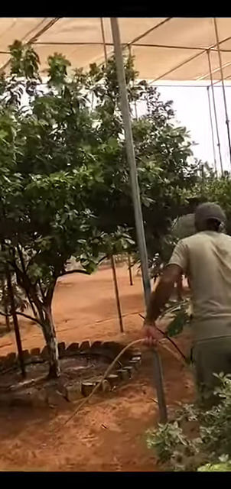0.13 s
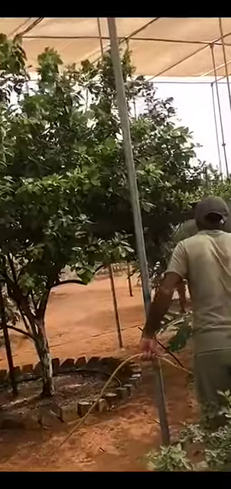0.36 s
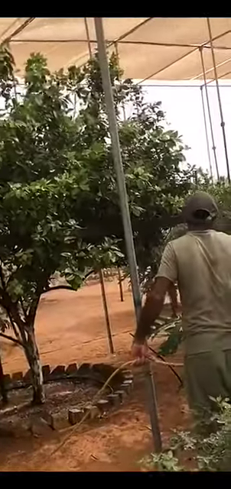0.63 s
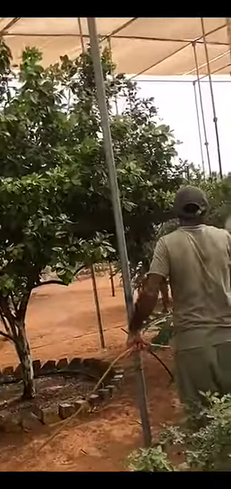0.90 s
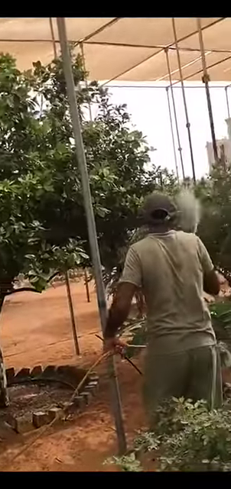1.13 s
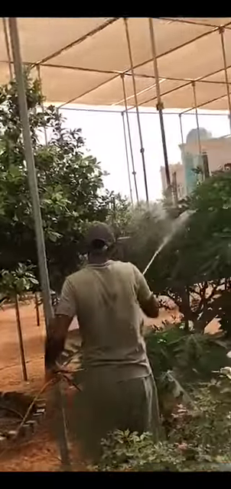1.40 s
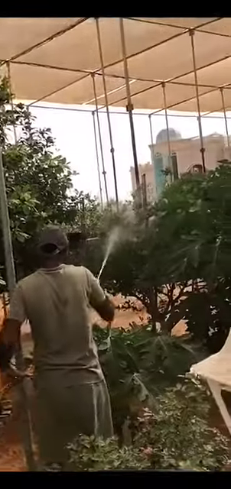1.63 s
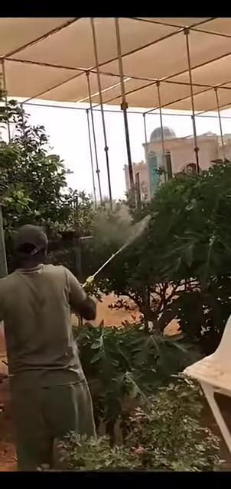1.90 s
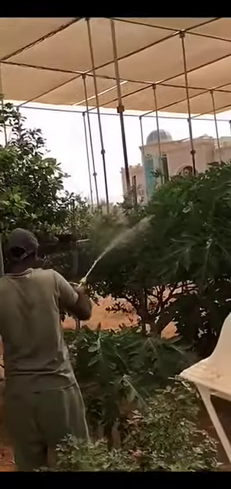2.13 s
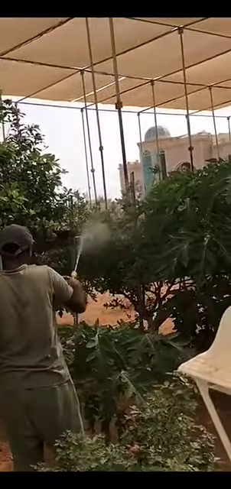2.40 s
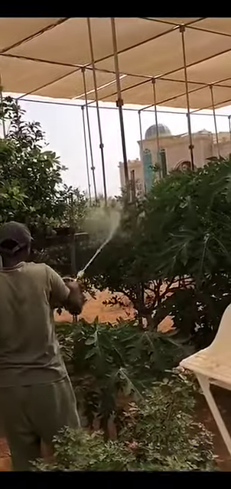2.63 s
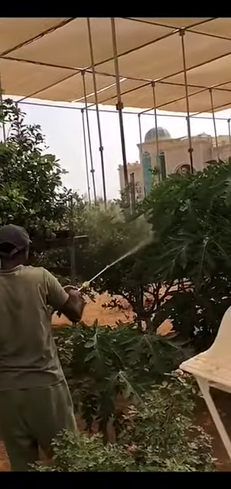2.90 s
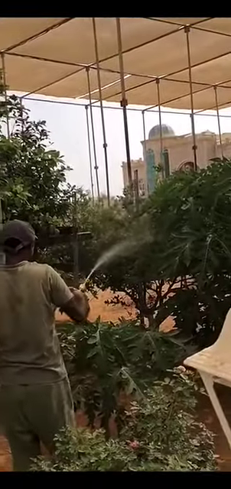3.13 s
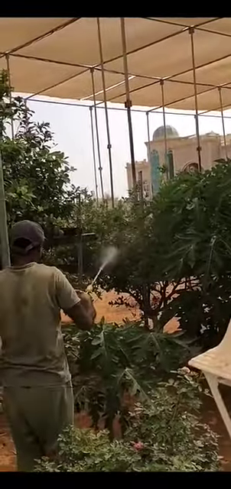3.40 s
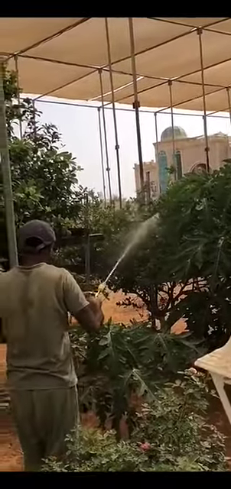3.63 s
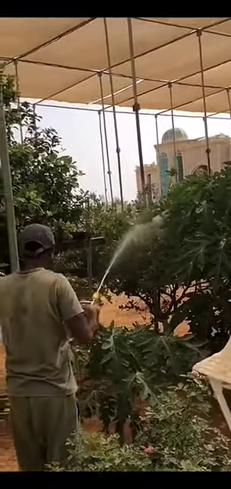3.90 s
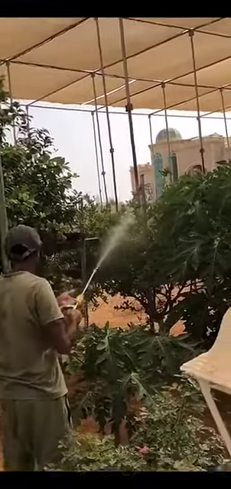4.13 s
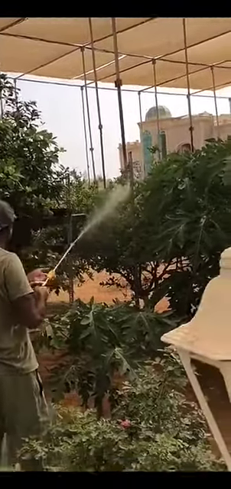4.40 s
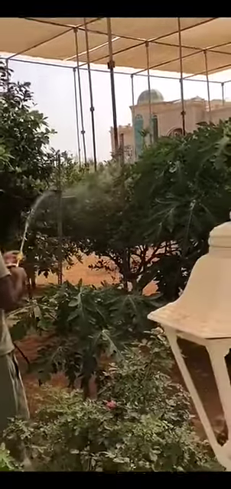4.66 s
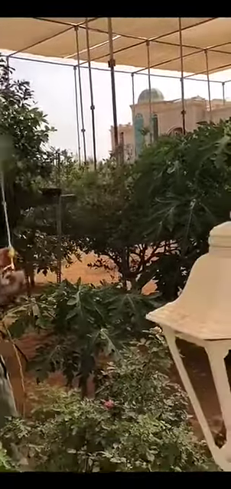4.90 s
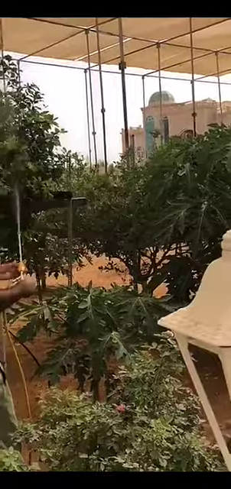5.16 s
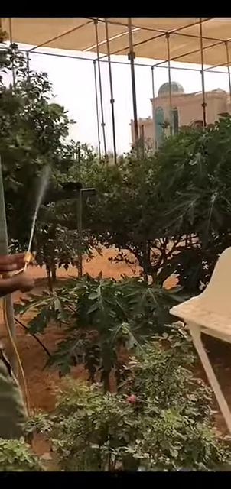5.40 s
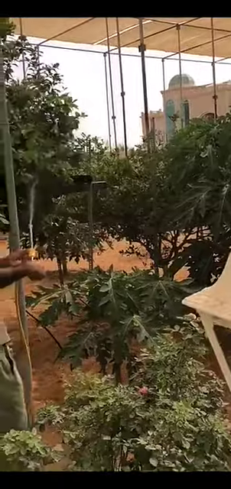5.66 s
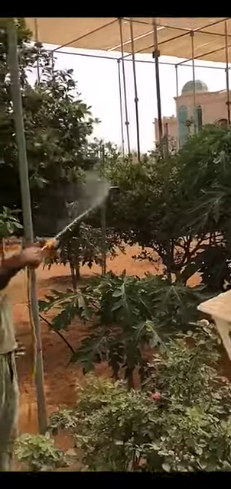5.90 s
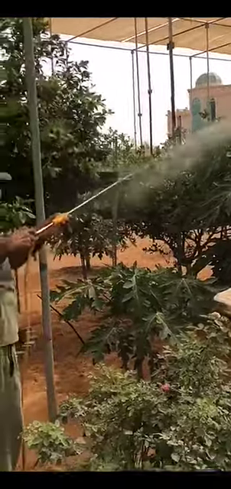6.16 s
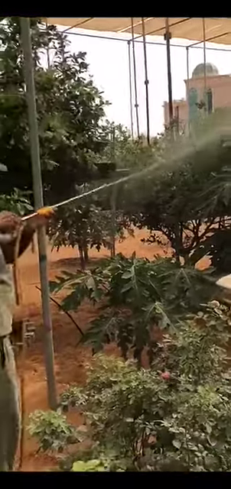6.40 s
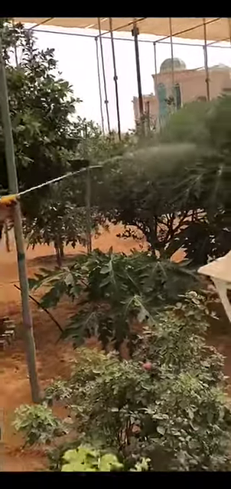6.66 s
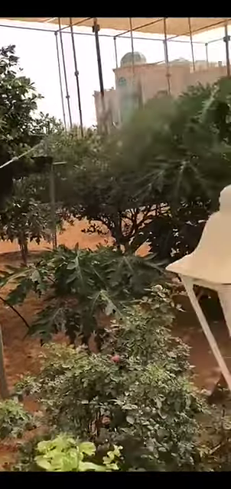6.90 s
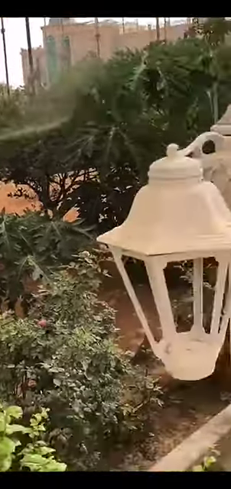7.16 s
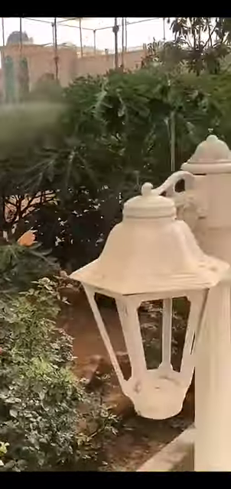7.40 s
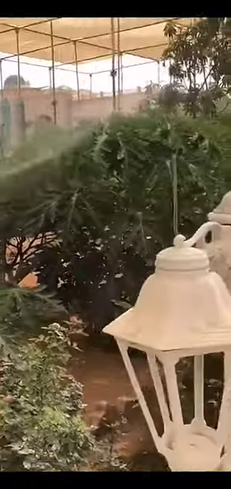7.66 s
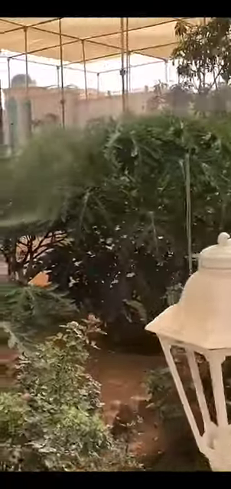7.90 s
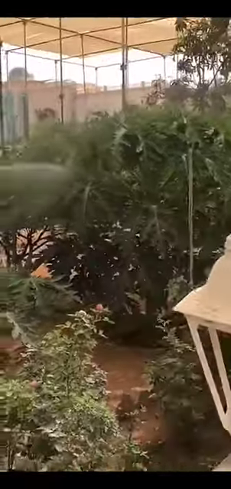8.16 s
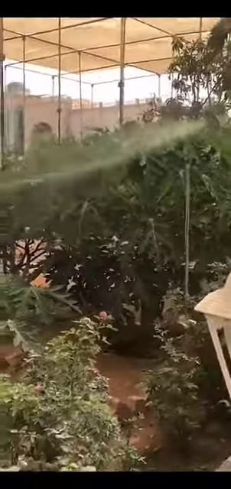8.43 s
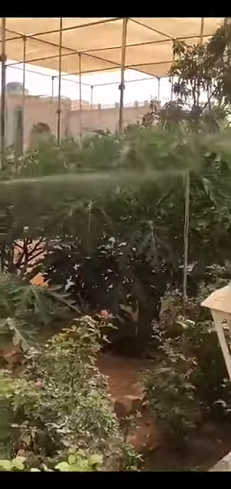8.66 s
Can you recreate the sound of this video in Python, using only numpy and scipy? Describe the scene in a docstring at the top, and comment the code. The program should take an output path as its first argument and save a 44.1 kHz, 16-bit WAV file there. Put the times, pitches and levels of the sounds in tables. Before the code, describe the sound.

A small single-cylinder engine drives a spray pump with a fast, low, rattling putter throughout. A fine jet hisses over it, pattering on leaves. A sparrow chirps early; just after three seconds the sound cuts out for an instant, then bird notes and low wind bumps follow. Leaf hits crowd together past five seconds, and the bird returns near seven. Outdoor garden, handheld microphone.

```python
"""A small single-cylinder engine drives a spray pump in a garden, its jet hissing and pattering on leaves.
A sparrow chirps twice early on; near 3 s the engine beat slips late, then all sound drops out briefly.
Bird notes and low wind bumps follow, then strong leaf hits past 5 s; later the engine turns away and the
bird returns. The engine is a sum of firing harmonics, rattle and jet are filtered noise, the bird is
gliding sines, and wind is low noise with short decaying waves."""
import sys
import numpy as np
from scipy import signal
from scipy.fft import rfft, irfft
from scipy.io import wavfile
from scipy.ndimage import uniform_filter1d

SR = 44100
rng = np.random.default_rng(int(sys.argv[2]) if len(sys.argv) > 2 else 0)


def output_pcm(signal):
    """Save a mono or channel-first signal as 16-bit PCM at the path in sys.argv[1].

    Samples are clipped to [-1, 1] before scaling.
    """
    pcm = np.clip(np.atleast_2d(signal).T, -1, 1) * 32767
    wavfile.write(sys.argv[1], SR, np.round(pcm).astype(np.int16))


def gain_from_db(level_db):
    """Turn a decibel level (scalar or array-like) into a linear amplitude factor."""
    decades = np.asarray(level_db, float) / 20
    return 10 ** decades


N = 387638
FIRING_HZ, FIRST_FIRING_S = 31.186, .0294


def in_time(rows):
    """Joins each column after the time column by straight lines, one value a sample."""
    seconds, *columns = np.transpose(rows)
    return [np.interp(np.arange(N) / SR, seconds, column) for column in columns]


def rms_one(x):
    """Scales to rms 1."""
    return x / np.sqrt(np.mean(x ** 2) + 1e-20)


def drift(rate_hz):
    """Slow chance of spread 1: noise at every 40th sample through a double one-pole low-pass."""
    pole = np.exp(-80 * np.pi * rate_hz / SR)
    noise = rng.standard_normal(N // 40 + 2002)
    slow = signal.lfilter([1], [1, -2 * pole, pole * pole], noise)[2000:]
    slow = rms_one(slow - slow.mean())
    return np.interp(np.arange(N) / 40, np.arange(len(slow)), slow)


def banded(source, spectrum, shared_db, own_db, own_rate):
    """Yields (centre Hz, coloured flickering band), about a third octave each, from two noises in turn."""
    hz, db = np.transpose(spectrum)
    top_hz = min(hz[-1], .45 * SR)
    edges = np.geomspace(hz[0], top_hz, int(3 * np.log2(hz[-1] / hz[0])) + 2)
    for k, (low, high) in enumerate(zip(edges, edges[1:])):
        centre = np.sqrt(low * high)
        bandpass = signal.butter(2, [low, high], "band", fs=SR, output="sos")
        band = signal.sosfilt(bandpass, source[k % 2])
        colour_db = np.interp(np.log(centre), np.log(hz), db)
        yield centre, band * gain_from_db(colour_db + shared_db + own_db * drift(own_rate))


def firing_phase(wander_s):
    """Counts engine cycles from the first firing; the governor lets the beat wander a little."""
    t = np.arange(N) / SR - FIRST_FIRING_S + wander_s * drift(1.73)
    return FIRING_HZ * t


def ringing_phases(db, puff_s):
    """Phases for a short symmetric puff that sets a causal exhaust ringing: minimum phase by cepstrum."""
    order = np.arange(129)
    log_level = np.log(gain_from_db(np.interp(order, 1 + np.arange(len(db)), db)))
    log_puff = -.5 * (2 * np.pi * FIRING_HZ * puff_s * np.minimum(order, 10)) ** 2
    cepstrum = irfft(log_level - log_puff)
    cepstrum[129:] = 0  # only the causal half
    # tones under the silencer's resonance run ahead of it
    lead = 1.3 * (np.maximum(5 - order, 0) + (order < 3))
    # tones just above that resonance arrive late
    tailpipe_lag = .35 * np.clip((order - 6) / 2, 0, 1) * (order < 11)
    # the half turn makes the puff arrive as a dip in pressure
    phase = 2 * rfft(cepstrum).imag + lead + np.pi - tailpipe_lag
    return phase[1:len(db) + 1]


def engine(turned, knock_db):
    """Low harmonics ring after each firing; high ones are valve and piston knocks spread round the cycle."""
    # Harmonics of the firing. Each row: multiple of the firing rate, rms level in dB facing the engine,
    # rms level in dB turned away; both before waver, knock and firing strength.
    tones = [(1, -51.0, -50.0), (2, -38.0, -37.0), (3, -44.5, -46.0), (4, -37.0, -34.0), (5, -28.2, -28.8),
             (6, -35.0, -36.5), (7, -44.0, -39.5), (8, -40.0, -41.0), (9, -37.0, -40.5), (10, -47.5, -46.5),
             (11, -44.5, -49.0), (12, -43.5, -48.5), (13, -52.0, -52.5), (14, -50.0, -55.0),
             (15, -55.0, -57.0), (16, -50.5, -47.5), (17, -59.0, -56.0), (18, -62.0, -60.5),
             (19, -59.0, -58.5), (20, -64.0, -62.5), (21, -66.5, -68.5), (22, -58.0, -61.0),
             (23, -53.5, -49.5), (24, -60.5, -59.5), (25, -55.5, -61.5), (26, -57.5, -68.0),
             (27, -52.5, -56.0), (28, -55.0, -56.0), (29, -56.5, -59.0), (30, -67.0, -66.0),
             (31, -62.0, -63.5), (32, -53.5, -57.0), (33, -58.5, -62.0), (34, -55.5, -55.5),
             (35, -63.0, -64.5), (36, -57.0, -57.0), (37, -60.0, -60.0), (38, -57.5, -56.5),
             (39, -66.0, -66.0), (40, -54.5, -55.5), (41, -60.0, -58.0), (42, -65.5, -65.0),
             (43, -67.5, -66.0), (44, -68.0, -74.0), (45, -62.5, -64.5), (46, -63.0, -63.5),
             (47, -62.0, -72.5)]
    knock_flicker_db, knock_slip_rad = 2.5, .45  # knocks are loose in strength and timing
    order, facing_db, away_db = np.transpose(tones)
    phases = ringing_phases(facing_db, puff_s=.00075)
    knocks = order > 16
    phases[knocks] = rng.uniform(0, 2 * np.pi, knocks.sum())
    cycles = firing_phase(wander_s=.00015)
    out = np.zeros(N)
    for k, near, far, phase in zip(order, facing_db, away_db, phases):
        level_db = near + turned * (far - near) + (0.079 + 0.064 * k) * drift(2.0)
        if k > 16:
            level_db = level_db + knock_db + knock_flicker_db * drift(6.1)
            phase = phase + knock_slip_rad * drift(4.0)
        out += gain_from_db(level_db) * np.cos(2 * np.pi * k * cycles + phase)
    # no two firings alike
    firing_strength = gain_from_db(.3 * rng.standard_normal(300))
    strength = firing_strength[np.floor(cycles + 1.1).astype(int)]
    return np.sqrt(2) * out * uniform_filter1d(strength, size=200)


def clatter(clatter_db, tilt_db):
    """Fan, fins and valve gear rattle as flickering noise; the low part is a puff that dies each cycle."""
    # Colour of the rattle. Each row: frequency in Hz, relative density in dB per Hz.
    rattle_colour = [(35, -55), (60, 1.5), (101, -5), (160, -12.5), (226, -1.5), (284, -19.5), (324, -10),
                     (504, -16), (556, -18), (851, -13.5), (1260, -22), (1530, -21.5), (3000, -32),
                     (3900, -68), (6600, -120)]
    puff_fade_db = 9  # fall over one engine cycle
    cycle_share = (firing_phase(wander_s=0) + .08) % 1
    puff = rms_one(uniform_filter1d(gain_from_db(-puff_fade_db * cycle_share), size=90))
    noise = rng.standard_normal((2, N))
    out = 0
    for hz, band in banded(noise, rattle_colour, .8 * drift(13.4), own_db=2.0, own_rate=2.2):
        tilted = band * gain_from_db(tilt_db * np.log2(hz / 900))
        out = out + tilted * (puff if 120 < hz < 600 else 1)
    return gain_from_db(clatter_db) * rms_one(out)


def stuttered(x):
    """At each recorder stutter the sound crosses over within 3 ms to a delayed copy of itself."""
    # Slips of the beat. Each row: start in seconds, added delay in seconds.
    slips = [(2.9655, .0158), (3.29, .0105)]
    t = np.arange(N) / SR
    for start, late in slips:
        share = np.clip((t - start) / .003, 0, 1)
        x = (1 - share) * x + share * np.roll(x, round(late * SR))
    return x


def covers(turned, tilt_db):
    """Covers and tank ring: steady noise passes twice through each resonance, wavering in level."""
    # Resonances of the machine's covers and tank. Each row: frequency in Hz, width in Hz, rms level in dB
    # facing, rms level in dB turned away, rise in dB per dB/octave of rattle brightness.
    resonances = [(838, 220, -46.5, -59, -5), (1075, 200, -63, -54, 3.5), (1275, 280, -66.5, -54.5, 4.5),
                  (1634, 230, -50, -72, -10), (2008, 580, -55.5, -62.5, 1.7), (2710, 420, -73.5, -56, 3.5),
                  (3810, 240, -60, -56.5, -0.2)]
    out = 0
    for hz, width_hz, facing_db, away_db, follows in resonances:
        radius, angle = np.exp(-np.pi * width_hz / SR), 2 * np.pi * hz / SR
        pole = [1, -2 * radius * np.cos(angle), radius * radius]
        once = signal.lfilter([1, 0, -1], pole, rng.standard_normal(N))
        ring = signal.lfilter([1, 0, -1], pole, once)
        level_db = facing_db + turned * (away_db - facing_db) + follows * tilt_db
        out = out + rms_one(ring) * gain_from_db(level_db + 1.5 * drift(4.0))
    return out


def jet():
    """Smooth nozzle hiss with clumps of drops on leaves; low bands follow the splash, high bands the hiss."""
    # The jet as the wand sweeps. Each row: time in seconds, rms level in dB, lower splash against
    # the hiss in dB, topmost sizzle against the hiss in dB.
    jet_course = [(0.0, -45.5, -4, 0), (0.5, -45, -1, 2), (1.3, -44, -1, 0), (1.6, -45, -5.5, 1),
                  (2.0, -43.5, -0.5, 0.5), (3.0, -44.5, 1, 1), (4.3, -45, 0, 0.5), (5.0, -44, 1.5, 3),
                  (5.4, -41, -4, 2), (5.8, -43.5, -1, 0.5), (6.1, -45.5, 1, 1), (6.6, -43, -1, 0),
                  (7.3, -44.5, 1.5, 0), (8.0, -42.5, 1.5, 2), (8.4, -44, 0.5, 1.5), (8.79, -41, -4.5, 0)]
    # Colour of the hiss. Each row: frequency in Hz, relative density in dB per Hz.
    hiss_colour = [(1180, -13.5), (2000, -1.5), (2110, -9.5), (2440, -10.5), (3430, -3.5), (3810, -6),
                   (4560, -7), (12100, -13.5), (13800, -17), (15600, -28)]
    level_db, splash_db, sizzle_db = in_time(jet_course)
    hiss_rise, splash_rise = leaf_hits()
    clumps = gain_from_db(.5 * hiss_rise + 2.2 * drift(14.0))
    # drops of either sign, near 4000 a second before clumping
    drops = (rng.random((2, N)) < 4000 * clumps / SR) * rng.choice([-1, 1], (2, N))
    drops = drops * gain_from_db(3.9 * np.minimum(rng.exponential(1, (2, N)), 5))
    source = rng.standard_normal((2, N)) + .5 * rms_one(drops)
    out = 0
    for hz, band in banded(source, hiss_colour, 0.67 * drift(29.0), own_db=2.0, own_rate=19.7):
        low = np.clip(np.log2(9000 / hz) * 0.5, 0, 1)
        top = np.clip(np.log2(hz / 9000) * 1.5, 0, 1) * (1 + hz / 30000)
        lifted = np.clip(np.log2(hz / 1600) * 1.5, 0, 1)  # leaf hits spare the lowest hiss
        splash = low * (splash_db + lifted * splash_rise)
        out = out + band * gain_from_db(splash + (1 - low) * hiss_rise + top * sizzle_db)
    return gain_from_db(level_db) * rms_one(out)


def leaf_hits():
    """Rises of hiss and splash in dB as the jet meets leaves: each swells, holds and fades a little slower."""
    # The jet lands squarely on a leaf. Each row: time in seconds, rise or dip of the hiss in dB,
    # rise or dip of the splash in dB, length in seconds.
    hits = [(0.054, 5.5, 2, 0.022), (0.482, 4.5, -6, 0.061), (1.383, 3.5, -2, 0.051),
            (1.684, 1.5, 2.5, 0.29), (2.299, 2.5, -1, 0.052), (2.427, 3, -3, 0.12), (3.186, 5.5, -4, 0.024),
            (3.35, 8.5, -4, 0.074), (3.77, 3, 3, 0.031), (4.77, 3, 1, 0.056), (5.048, 4.5, 7, 0.031),
            (5.075, 5.5, 3, .022), (5.13, 4, -2, .04), (5.186, 8, -1, 0.024), (5.236, 3, 4, 0.036),
            (5.277, 5.5, 0, 0.029), (5.355, 3, 2, 0.051), (5.47, 0, 6, .03), (5.505, -2.5, 1, 0.046),
            (5.57, 4, 1, 0.045), (5.652, 4.5, -2, 0.028), (5.706, 9, -2, 0.047), (6.6, 2.5, 3.5, 0.06),
            (6.704, 1, 3, 0.081), (7.197, 4.5, 0.5, 0.058), (7.35, 1.5, 1, 0.034), (8.07, 3.5, 5.5, 0.13),
            (8.11, 3, -0.5, 0.06), (8.317, 1, 7, 0.023), (8.622, 2, 5.5, 0.053), (8.7, 0.5, 6, .07)]
    # lighter random brushes: count, mean rise in dB, mean length in seconds
    count, graze_db, graze_s = 30, 1.2, .025
    t, rise = np.arange(0, N, 40) / SR, 0
    grazes = rng.random((count, 4)) * [N / SR, 2 * graze_db, 2 * graze_db, graze_s]
    grazes = grazes + [0, 0, 0, graze_s / 2]
    for middle, hiss_db, splash_db, length in [*hits, *grazes]:
        spread = length * np.where(t < middle, .55, .6)
        swell = np.exp(-.7 * np.abs((t - middle) / spread) ** 4)
        rise = rise + np.outer([hiss_db, splash_db], swell)
    return [np.interp(np.arange(N) / SR, t, r) for r in rise]


def sparrow():
    """Arched whistles and straight slides, sines rasping in level, the arches in pitch too; two leafy echoes."""
    # Arched notes, two voices overlapping. Each row: start in seconds, length in seconds, top in Hz,
    # rise to it in Hz, fall from it in Hz, level in dB before swell and rasp.
    chirps = [(0.435, .05, 6700, 150, 150, -46), (.51, .05, 6450, 100, 100, -49),
              (3.682, .036, 5750, 800, 300, -48), (3.745, .025, 6150, 400, 0, -49),
              (3.788, .026, 6200, 300, 200, -50), (3.792, .022, 5450, 0, 100, -43.5),
              (3.843, .013, 6100, 30, 30, -48), (3.888, .018, 4720, 300, 300, -46.5),
              (6.72, .035, 5500, 450, 0, -48), (6.824, .038, 5650, 0, 100, -44),
              (6.886, .04, 6150, 450, 0, -46), (6.918, .028, 6150, 100, 200, -37.5),
              (6.922, .024, 5550, 200, 200, -46), (7.014, .022, 4640, 350, 300, -46.5),
              (7.55, 0.028, 6500, 150, 150, -45)]
    # Steep slides into and out of those notes. Each row: start in seconds, length in seconds,
    # first pitch in Hz, last pitch in Hz, peak in dB before rasp.
    slides = [(3.714, .009, 5500, 4250, -43.5), (3.777, .013, 4000, 5900, -42.5),
              (3.812, .015, 5400, 4150, -44), (6.812, .012, 3800, 5500, -51), (6.849, .02, 5400, 3600, -46),
              (6.914, .009, 4600, 5400, -46), (6.944, .016, 5900, 5000, -44.5),
              (6.946, .015, 5300, 3700, -47)]
    flatness, sag_hz_per_s = 2.5, 4000  # a higher power holds the top longer; the top drifts down
    peak, swell_db = .55, 6  # loudest point as a share of the note; start and end lie this far below
    legs_db_per_khz = 5  # the steep rise and fall sound louder than the held top
    out, t = np.zeros(N), np.arange(N) / SR
    rasp, flutter = drift(150.0), drift(400.0)
    for start, length, top_hz, rise_hz, fall_hz, db in chirps:
        i = slice(int(start * SR), int((start + length) * SR))
        u = (t[i] - start) / length
        arch = np.where(u < .5, rise_hz, fall_hz) * np.abs(2 * u - 1) ** flatness
        hz = top_hz - arch - sag_hz_per_s * length * (u - .5)
        from_peak = np.where(u < peak, (peak - u) / peak, (u - peak) / (1 - peak))
        note_db = db - swell_db * from_peak + legs_db_per_khz * (top_hz - hz) / 1000
        fade = np.clip(np.minimum(u, 1 - u) * length / 0.0015, 0, 1)
        turns = np.cumsum(hz * (1 + .008 * flutter[i])) / SR
        out[i] += fade * gain_from_db(note_db + 3.0 * rasp[i]) * np.sin(2 * np.pi * turns)
    for start, length, from_hz, to_hz, db in slides:
        i = slice(int(start * SR), int((start + length) * SR))
        u = (t[i] - start) / length
        turns = np.cumsum(from_hz + (to_hz - from_hz) * u) / SR
        swell = np.sqrt(np.abs(np.sin(np.pi * u)))
        out[i] += swell * gain_from_db(db + rasp[i]) * np.sin(2 * np.pi * turns)
    near_echo = gain_from_db(-14) * np.roll(out, round(0.017 * SR))
    far_echo = gain_from_db(-15) * np.roll(out, round(0.048 * SR))
    return out + near_echo + far_echo


def wind():
    """Wind on the microphone: lumpy low noise, and single bumps as sines under a short bell-shaped swell."""
    # Rumble. Each row: time in seconds, level in dB before the lumps.
    wind_course = [(0.0, -38), (1.8, -61), (3.0, -37.5), (4.2, -36), (4.3, -37), (4.45, -30), (4.7, -36),
                   (5.09, -37), (5.25, -53), (5.7, -55), (6.1, -47), (6.36, -45), (6.7, -54), (7.2, -52),
                   (8.79, -42)]
    # Gust bumps, the last row a light knock. Each row: middle of the swell in seconds,
    # height of the swell in dB, frequency in Hz.
    bumps = [(3.62, -18.5, 50), (3.8, -27, 75), (3.95, -28, 55), (4.045, -24, 42), (4.24, -24, 50),
             (4.42, -27, 45), (4.494, -20, 60), (4.55, -27, 50), (4.67, -18, 57.6), (4.831, -23, 52.7),
             (5.19, -26, 40), (6.518, -23, 62), (7.248, -27, 240)]
    bandpass = signal.butter(2, [26, 95], "band", fs=SR, output="sos")
    rumble = signal.sosfilt(bandpass, rng.standard_normal(N))
    out = rms_one(rumble) * gain_from_db(in_time(wind_course)[0] + 0.89 * drift(4.7))
    t = np.arange(N) / SR
    for middle, db, hz in bumps:
        cycles = (t - middle) * hz
        swell = np.exp(-.5 * (cycles / np.where(cycles < 0, .6, .9)) ** 2)
        out = out + gain_from_db(db) * swell * np.sin(2 * np.pi * cycles)
    return out


def scene():
    """Mixes engine, jet, wind and bird at one microphone; the stutters touch engine tones and rattle alone."""
    # The microphone swings round the engine. Each row: time in seconds, share turned away (0 facing, 1 away),
    # rattle rms level in dB, rattle brightness in dB per octave, gain of the knock tones in dB.
    engine_course = [(0, 0, -40.5, 4, -1), (1.2, 0.08, -39.5, 3, -2), (1.6, 0.15, -38.5, 1, 0),
                     (3.3, 0.13, -42, 0, -0.5), (4.5, 0.12, -38.5, 0, -1), (5.5, 0, -38.5, 1.5, -1),
                     (6.6, 0, -37.5, 2, -1), (7.3, 0.67, -40, 0, -1), (8, 1, -40.5, 0.5, 0),
                     (8.79, 1.1, -40.5, 0, -2.5)]
    turned, clatter_db, tilt_db, knock_db = in_time(engine_course)
    beat = stuttered(engine(turned, knock_db) + clatter(clatter_db, tilt_db))
    pump = beat + covers(turned, tilt_db)
    return (pump + jet() + wind() + sparrow())[None, :]


def band_limit(x):
    """A steep low-pass at the top of the band."""
    return signal.sosfilt(signal.butter(12, 15710, fs=SR, output="sos"), x)


def record(dry):
    """The top rolls off steeply and the recorder falls silent for a moment, fading back in over 3 ms."""
    # Silent gap: start in seconds, end in seconds.
    dropout_span = (3.2612, 3.3088)
    silent_from, silent_until = dropout_span
    t = np.arange(N) / SR
    sounding = np.where(t < silent_from, 1, np.clip((t - silent_until) / .003, 0, 1))
    dull = signal.sosfilt(signal.butter(8, 14600, fs=SR, output="sos"), dry)
    return band_limit(dull * sounding)


dry = scene()
out = record(dry)
output_pcm(out)
```